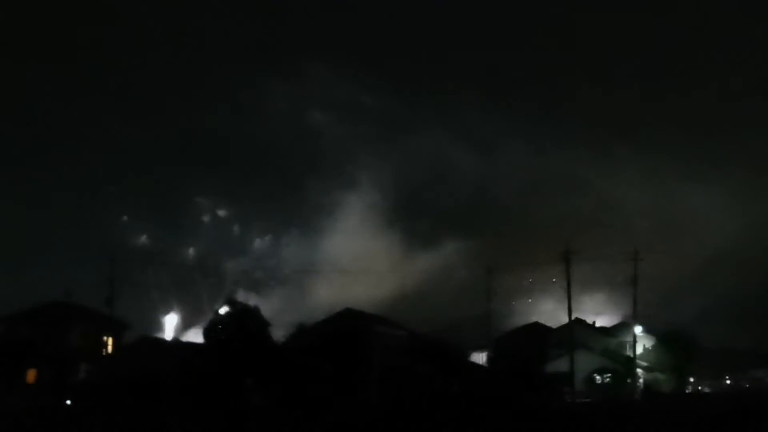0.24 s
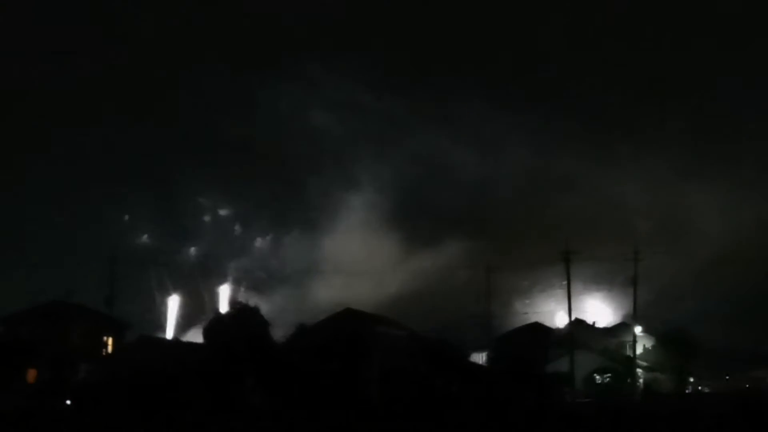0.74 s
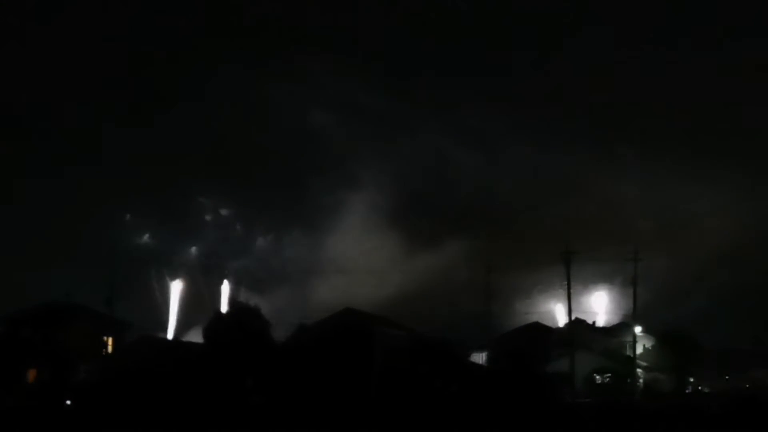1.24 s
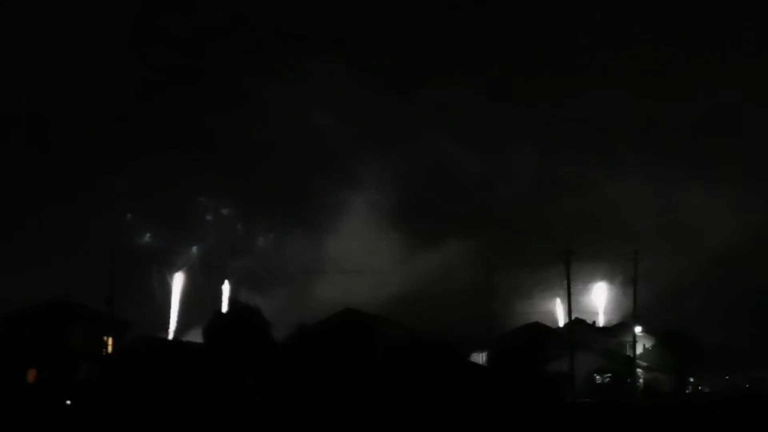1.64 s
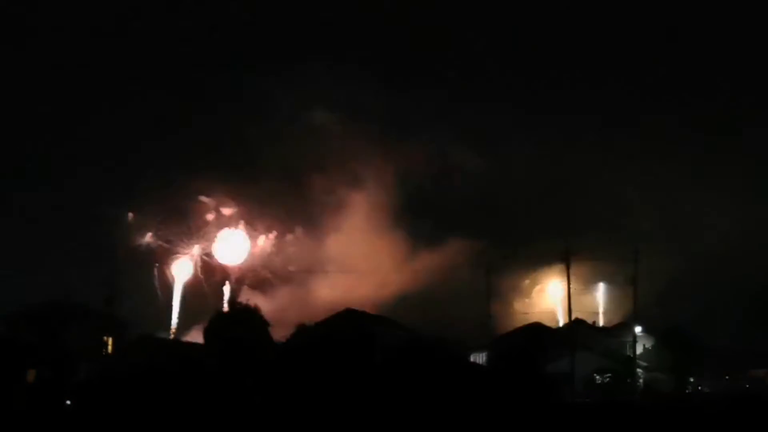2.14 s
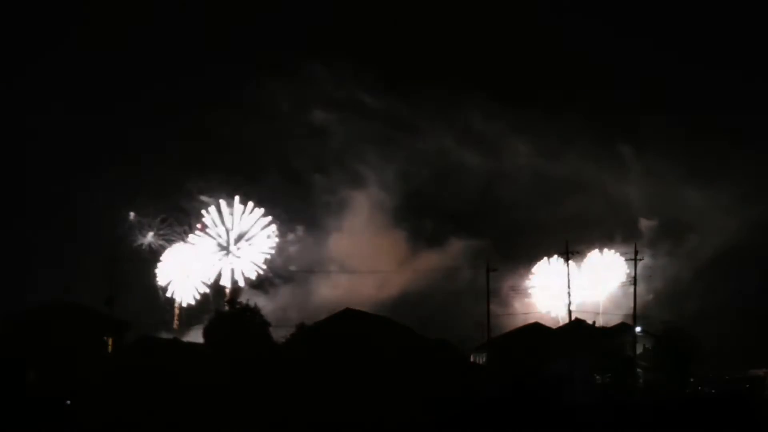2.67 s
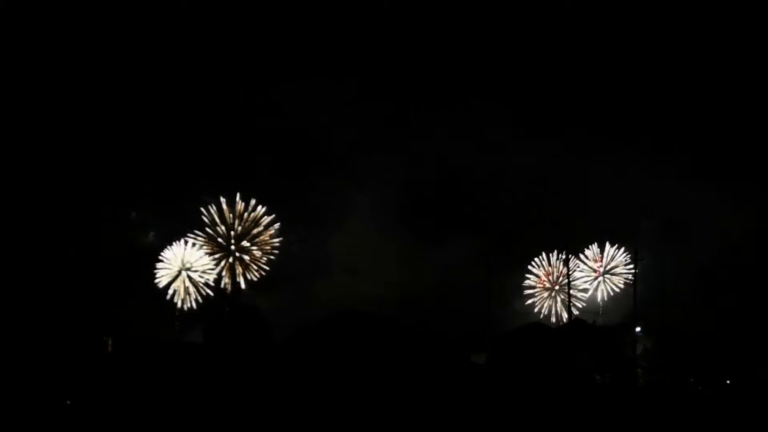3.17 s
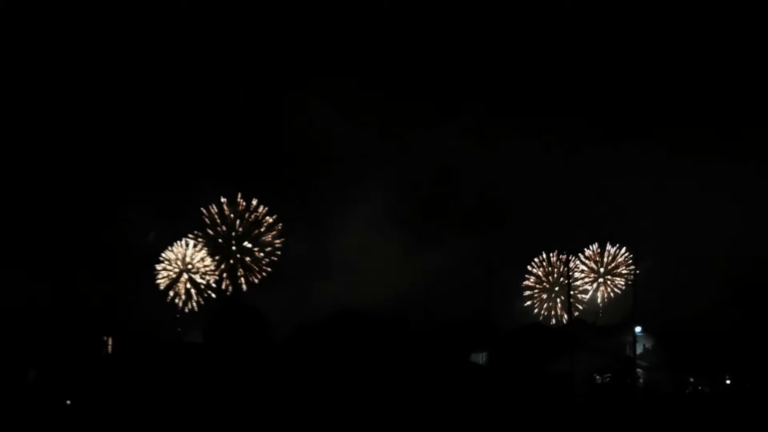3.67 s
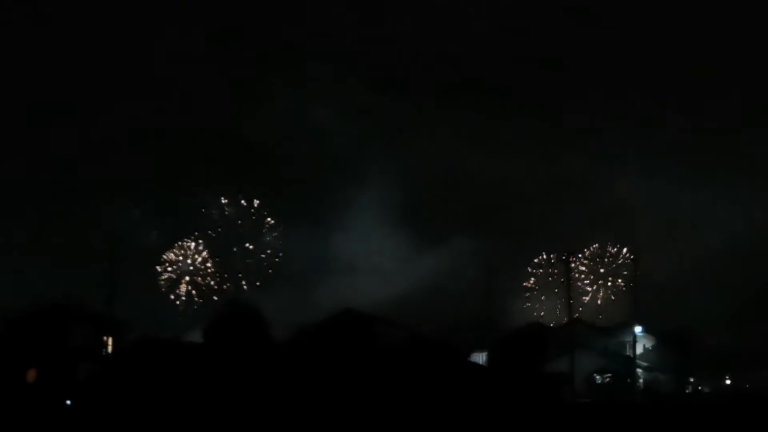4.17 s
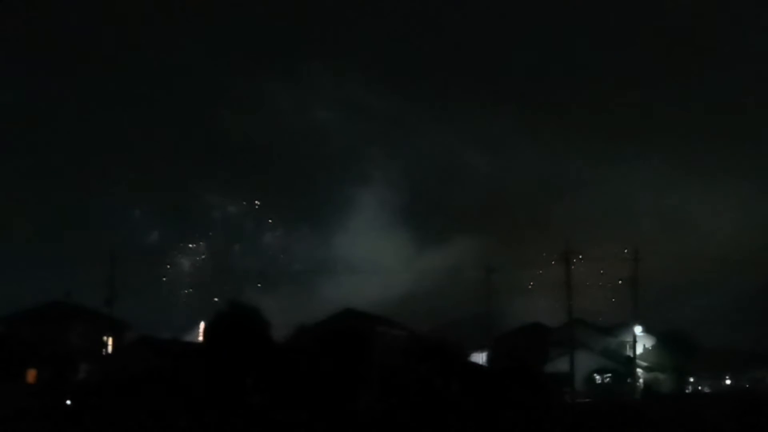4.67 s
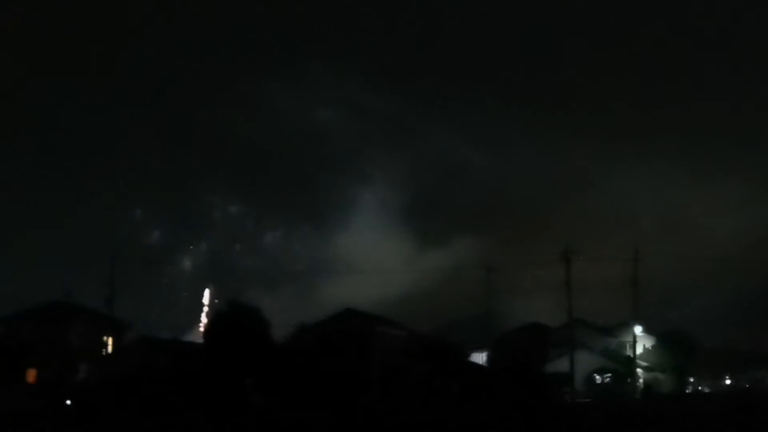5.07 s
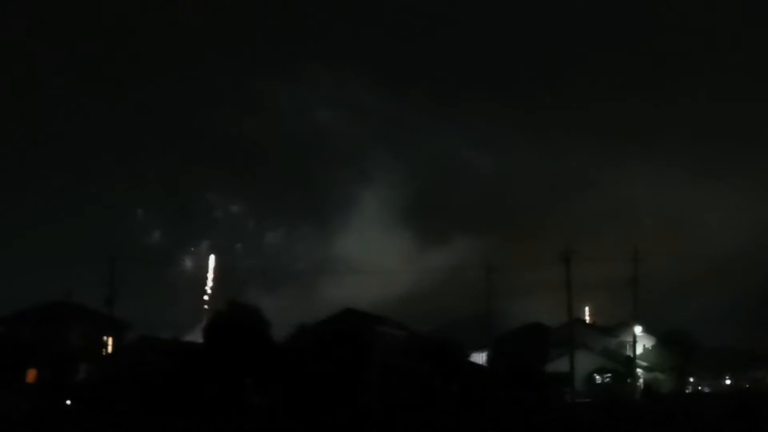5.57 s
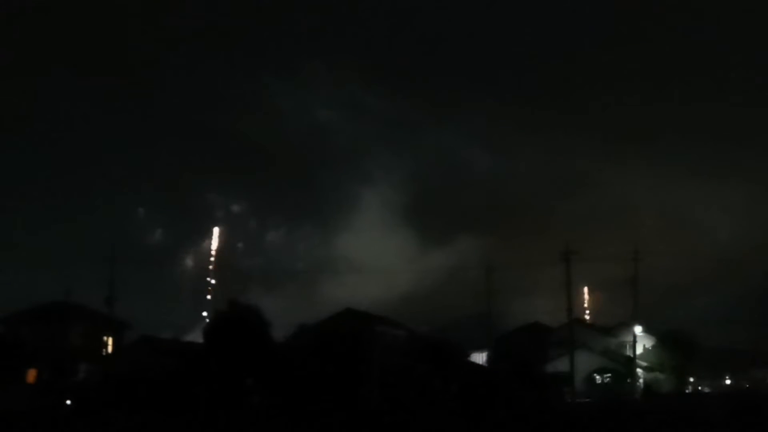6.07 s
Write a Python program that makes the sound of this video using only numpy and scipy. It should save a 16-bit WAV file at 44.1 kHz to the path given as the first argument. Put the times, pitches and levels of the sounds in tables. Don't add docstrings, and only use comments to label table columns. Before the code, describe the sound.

Night, outdoors, fireworks bursting far away across open land. At 0.1 s a sharp crack with a deep thump hits, followed at 0.19 s by a second, fuller blast. Ground, roofs and a wall answer within moments, bright puffs return from house fronts until about 0.5 s, and everything merges into a lumpy, bass-heavy roll that fades. Faint stray echoes knock near 0.9 to 1.3 s. Weaker, rounder low bursts thud at 1.46, 1.58 and 1.81 s, with brighter ground snaps. Between 1.36 and 1.66 s a camera close on the left clatters with dry clicks and a very brief gear whirr; tiny clicks follow at 2.05 s. From 2 to 5 s only dwindling rumble and soft distant thuds remain over town hum and fine steady hiss. At 5.15 and 5.25 s two strong bangs crack, their puffs and deep echoes rolling until the end at 6.3 s.

```python
import sys
import numpy as np
from scipy import signal
from scipy.fft import rfft, irfft, next_fast_len
from scipy.io import wavfile
from scipy.ndimage import uniform_filter1d, map_coordinates

SR = 44100
rng = np.random.default_rng(int(sys.argv[2]) if len(sys.argv) > 2 else 0)


def output_pcm(signal):
    pcm = np.clip(np.atleast_2d(signal).T, -1, 1) * 32767
    wavfile.write(sys.argv[1], SR, np.round(pcm).astype(np.int16))


def gain_from_db(level_db):
    decades = np.asarray(level_db, float) / 20
    return 10 ** decades


N = 278271

# time in seconds, crack level in dB, crack pitch in Hz, thump level in dB, thump pitch in Hz.
BURSTS = [
    (.0898, -5, 250, -16, 95),
    (.1847, -4, 240, -22, 95),
    (.1895, -6, 290, -13, 85),
    (.1936, -26, 340, -18, 115),
    (1.4602, -19, 420, -8, 120),
    (1.5808, -19, 330, -10, 120),
    (1.8117, -11, 300, -12, 140),
    (5.1475, -4.5, 300, -13, 195),
    (5.2471, -7, 260, -7, 85),
]
# time in seconds, level in dB, pitch in Hz.
GROUND_SNAPS = [
    (.0931, -21, 300),
    (.0980, -24, 340),
    (.1879, -13, 340),
    (1.4627, -14, 1200),
    (1.5835, -25, 510),
    (1.8125, -12, 780),
    (1.8169, -20, 640),
    (5.2495, -8, 320),
]
# time in seconds, crack level in dB, crack pitch in Hz.
ROOF_BOUNCES = [
    (.1007, -20, 220),
    (.1994, -25, 270),
    (1.5896, -27, 380),
    (1.8155, -25, 690),
    (1.8185, -20, 190),
    (5.1557, -17, 290),
    (5.1585, -17, 270),
    (5.2550, -25, 330),
]
# time in seconds, crack level in dB, thump level in dB.
WALL_ECHOES = [
    (0.1367, -31.5, -25.5),
    (0.225, -16, -40),
    (0.2318, -28.5, -22),
    (5.195, -22, -26.5),
    (5.2971, -33, -18.5),
]
# time in seconds, knock level in dB, thud level in dB.
LATE_ECHOES = [(0.293, -33, -26.5), (0.318, -32, -38), (0.892, -66, -65), (1.022, -42, -36.5),
               (1.271, -41.5, -57), (1.925, -34, -42), (1.931, -36, -42), (2.29, -37.5, -44),
               (2.352, -42.5, -51.5), (2.467, -47, -55), (2.928, -45, -37), (3.085, -58, -40),
               (3.191, -61, -52), (3.282, -77, -36), (3.434, -52.5, -39), (3.665, -57, -39),
               (3.692, -52, -52), (3.74, -46, -33.5), (3.771, -71.5, -35), (3.906, -65.5, -55),
               (4.014, -71, -36.5), (4.195, -48, -64), (4.348, -65.5, -41), (5.409, -44.5, -50),
               (5.51, -31.5, -45), (5.732, -48, -46), (5.82, -61, -46), (5.882, -38.5, -64),
               (6.03, -44, -55)]
# frequency in Hz, left over right in dB.
BURST_LEAN = [(60, 1.5), (180, 1), (550, -3.5), (1650, -0.5), (4970, -8), (15000, 2.5)]
# frequency in Hz, gain in dB.
EDGE_TONE = [(60, -3), (130, -5.5), (300, -2), (1000, 1.5), (2500, 8), (5000, 7.5), (8000, -4.5)]
# frequency in Hz, time to fall 60 dB in seconds.
LAND_FADE = [(60, 0.35), (300, 0.22), (1500, .1), (3000, 0.033), (6000, 0.012)]
# time in seconds, peak level in dB.
PUFFS = [(0.105, -47.5), (0.204, -39), (0.289, -46.5), (0.369, -44), (0.391, -42), (0.468, -40),
         (0.5294, -56), (2.155, -65), (2.285, -62.5), (2.35, -67), (3.738, -65.5), (5.273, -48),
         (5.337, -48.5), (5.402, -56), (5.46, -54), (5.52, -47.5), (5.5384, -47), (5.572, -49.5),
         (5.629, -53.5), (5.876, -57.5)]
# frequency in Hz, level in dB per Hz.
PUFF_TONE = [(410, -25), (700, 0), (1130, -9.5), (1290, -16.5), (1570, -7.5), (1980, -4), (2240, -6),
             (2660, -16.5), (3760, -24), (5380, -32), (8000, -54), (10400, -82.5), (17600, -120)]
# time in seconds, level in dB, hold in seconds,
# bass share in dB, bass delay in seconds.
VOLLEYS = [
    (.1, -46.5, 0.18, -9, 0.038),
    (0.203, -42.5, 0.3, -0.5, 0.11),
    (1.471, -52, 0.087, -7, 0.057),
    (1.572, -48.5, 0.047, 0, 0.14),
    (1.818, -52.5, .2, 4, 0.0426),
    (5.15, -47, 0.092, -17.5, 0.04),
    (5.261, -42.5, 0.29, 5.5, .06),
]
# frequency in Hz, level in dB per Hz.
BOOM_TONE = [(15, -47), (25, -20), (96, 5), (114, -0.5), (135, -3), (200, -11), (260, -49), (440, -120)]
# frequency in Hz, level in dB per Hz.
BODY_TONE = [(82, -28.5), (140, -5), (291, -6), (398, -9), (753, -13.5), (1100, -19), (1430, -55),
             (2420, -120)]
# frequency in Hz, level in dB per Hz.
RATTLE_TONE = [(470, -50.5), (800, -21.5), (1060, -15.5), (1190, 3), (1290, 3), (2330, -7), (7000, -46.5),
               (9100, -79), (15400, -120)]
# frequency in Hz, left-right likeness from -1 to 1.
LIKENESS = [(60, 0.96), (130, 0.98), (290, 0.86), (640, 0.33), (1410, -0.23), (3100, 0.03), (6820, 0.1),
            (15000, 0.05)]
# time in seconds, peak level in dB, left over right in dB.
CLICKS = [(.405, -52, -4), (.415, -51, -2), (1.3627, -51.5, 8), (1.3805, -59, 0.5), (1.4903, -27.5, -1),
          (1.5084, -43, 12.5), (1.5141, -23.5, 15), (1.5524, -36, 21.5), (1.5865, -25.5, 12),
          (1.6436, -48, 3), (1.6504, -19.5, 11), (1.6644, -52.5, 2), (2.054, -57, 6), (2.061, -47, -4.5),
          (2.0786, -56, 5)]
# frequency in Hz, level in dB per Hz.
CASING_TONE = [(710, -44.5), (1200, -13.5), (2130, -14), (2510, -4.5), (3080, -17.5), (4750, -13),
               (7410, -17.5), (8530, -11), (14000, -29.5), (16000, -29.5)]
# end in seconds, length in seconds, top level in dB.
MOTOR_RUNS = [
    (1.572, .08, -42),
    (1.588, .01, -51.5),
    (1.661, .012, -58),
]
# frequency in Hz, level in dB.
GEAR_TONE = [(880, -18), (1500, -5.5), (2060, -5.5), (2910, -4), (4920, -12.5), (5330, -13), (8660, -12),
             (14600, -16), (16000, -26)]
# time in seconds, hum level in dB.
TOWN_LEVEL = [(0, -51.5), (2.4, -51.5), (3.5, -51), (5.1, -53), (6.31, -52)]
# frequency in Hz, level in dB per Hz.
HUM_TONE = [(15, -28.5), (25, -9.5), (59, 3), (113, -8.5), (245, -3.5), (286, -6.5), (545, -9),
            (609, -11.5), (711, -13.5), (948, -20.5), (5000, -54.5), (6500, -93.5), (11000, -120)]
# frequency in Hz, level in dB per Hz.
HISS_TONE = [(2000, -39.5), (3500, -16), (4300, 1.5), (5200, 2.5), (7000, -2.5), (8200, -4.5), (9700, 0),
             (10900, 4), (12500, -2), (15700, -4), (16000, -20), (16500, -120)]


def shells():
    out = np.zeros((2, N))
    lead_s = 1 / 100
    fronts = BURSTS + [(*row, -60, 100) for row in GROUND_SNAPS]
    fronts += [(*row, -31, 115) for row in ROOF_BOUNCES]
    for s, *shape in fronts:
        lag_ms = 0.04 if 1 < s < 2 else 0.072
        add(out, s - lead_s, front(*shape, lag_ms))
    for s, crack_db, thump_db in WALL_ECHOES:
        add(out, s - lead_s, front(crack_db, 228, thump_db, 102, lag_ms=0.23))
    chances = rng.uniform(-0.65, 1, (len(LATE_ECHOES), 2))
    for (s, knock_db, thud_db), (direction, size) in zip(LATE_ECHOES, chances):
        t = moments(0.15 * direction)
        knock = swing(t, knock_db - 3, 950 * (1 + 0.54 * size), 0.95, 0.00018)
        thud = swing(t, thud_db, 240 * (1 + 0.15 * size), 1.1, 0.0009)
        add(out, s - lead_s + 0.001, knock + thud)
    return filtered(out, lambda hz: 1 / (1 + (hz / 3200) ** 6))


def front(crack_db, crack_hz, thump_db, thump_hz, lag_ms):
    t = moments(lag_ms)
    crack_rise, thump_rise = 0.0001 * gain_from_db(-0.4 * np.array([crack_db, thump_db]))
    tip = swing(t, 1.4 * crack_db - 9.5, 1600, 2.5, 0.8 * crack_rise)
    crack = swing(t, crack_db, crack_hz, 1.4, crack_rise)
    thump = swing(t, thump_db, thump_hz, 1.3, thump_rise)
    return tip + crack + thump


def moments(lag_ms):
    t = np.arange(-SR // 100, SR // 12) / SR
    return t + np.array([[1], [-1]]) * lag_ms / 2000


def swing(t, db, hz, damping, rise):
    onset = 0.5 + 0.5 * np.tanh(t / rise + 1)
    decay = np.exp(-damping * hz * np.abs(t))
    return gain_from_db(db) * onset * decay * np.cos(2 * np.pi * hz * t)


def ragged(x):
    t = np.arange(SR // 8) / SR
    fading = gain_from_db(-60 * t / 0.062)
    trail = signal.fftconvolve(np.maximum(x, 0) ** 2, fading / 40)[:N]
    noise = gain_from_db(-25.5) * trail * rush(PUFF_TONE, lumpy_db=3.5, lump_ms=4)
    return filtered(noise, lambda hz: 1 / (1 + (hz / 4500) ** 4))


def scatter(x):
    out, step = np.zeros((2, N)), SR // 7
    for start in range(0, N, step):
        hz, t, z = signal.stft(rng.standard_normal((2, SR // 3)), SR, nperseg=256)
        fading = gain_from_db(-60 * t / along(LAND_FADE, hz)[:, None])
        mid, side = signal.istft(z * fading, SR, nperseg=256)[1]
        tail = np.array([mid, side]) / np.linalg.norm(mid)
        add(out, start / SR + 0.001227, signal.fftconvolve(x[None, start:start + step], tail, axes=1))

    def width(hz):
        likeness = along(LIKENESS, hz)
        return np.sqrt([1 + likeness, 1 - likeness]) / np.sqrt(2)

    mid, side = filtered(out, width)
    return np.array([mid + side, mid - side])


def puffs():
    fall_s = 0.027
    rise_s = fall_s / 4
    t = np.arange(N) / SR - rise_s
    level = np.zeros(N)
    for s, db in PUFFS:
        spread = np.where(t < s, rise_s, fall_s)
        level += gain_from_db(db - 4) * np.exp(-((t - s) / spread) ** 2)
    return level * rush(PUFF_TONE, lumpy_db=2, lump_ms=5)


def roll():
    s, db, hold, bass_db, late = np.transpose(VOLLEYS)[:, :, None]
    rattle_db = -13.5
    boom = swell(s + late, db + bass_db, hold + 0.09 - late, fall=72, far_db=-13)
    body = swell(s, db, hold, fall=95, far_db=-7.5)
    rattle = swell(s, db + rattle_db, hold, fall=49, far_db=-21.5 - rattle_db)
    out = boom * rush(BOOM_TONE, lumpy_db=1, lump_ms=30)
    out += body * rush(BODY_TONE, lumpy_db=2, lump_ms=18)
    return out + rattle * rush(RATTLE_TONE, lumpy_db=2.5, lump_ms=12)


def swell(start, db, hold, fall, far_db):
    t = np.arange(N) / SR - start
    near = gain_from_db(db - fall * np.maximum(t - hold, 0)) ** 2
    far = gain_from_db(db + far_db - 7.37 * np.maximum(t, 0)) ** 2
    rise = np.clip(t / 0.015, 0, 1) ** 2
    return np.sqrt(np.sum(rise * (near + far), axis=0))


def camera():
    return casing_clicks() + gear_whirr()


def casing_clicks():
    clicks, t = np.zeros((2, N)), np.arange(SR // 10) / SR
    for s, db, pan_db in CLICKS:
        envelope = gain_from_db(db - 60 * t / 0.015) * (1 - np.exp(-t / 0.00012))
        rattle = envelope * rng.standard_normal((2, len(t)))
        add(clicks, s, rattle * gain_from_db(np.array([[0.5], [-0.5]]) * pan_db))
    return gain_from_db(9.5) * filtered(clicks, lambda hz: gain_from_db(along(CASING_TONE, hz)))


def gear_whirr():
    gears = unit(filtered(rng.standard_normal((2, N)), lambda hz: gain_from_db(along(GEAR_TONE, hz))))
    t = np.arange(N) / SR
    level = np.zeros(N)
    for end, length, db in MOTOR_RUNS:
        slope = np.where(t < end, 300, 800)
        level += (t > end - length) * gain_from_db(db - slope * np.abs(t - end))
    return level * gain_from_db([[3], [-9]]) * gears


def night():
    s, db = np.transpose(TOWN_LEVEL)
    level = uniform_filter1d(np.interp(np.arange(N) / SR, s, db), size=200)
    hum = gain_from_db(level) * rush(HUM_TONE, lumpy_db=1.34, lump_ms=25)
    return hum + gain_from_db(-87) * rush(HISS_TONE, lumpy_db=0, lump_ms=10)


def rush(spectrum, lumpy_db, lump_ms):
    per_second = 1000 / lump_ms
    knots = rng.standard_normal(int(N / SR * per_second) + 4)
    lumps = map_coordinates(knots, [np.arange(N) / SR * per_second])
    pair = rng.standard_normal((2, N)) * gain_from_db(lumpy_db * lumps)

    def colour(hz):
        turn = np.arccos(np.clip(along(LIKENESS, hz), -1, 1)) / 2
        return gain_from_db(along(spectrum, hz)) * [np.cos(turn), np.sin(turn)]

    mid, side = filtered(pair, colour)
    return unit(np.array([mid + side, mid - side]))


def unit(x):
    return x / np.sqrt(np.mean(x ** 2) + 1e-20)


def along(points, hz):
    f, v = np.transpose(points)
    return np.interp(np.log(hz + 1), np.log(f + 1), v)


def filtered(x, response):
    m = next_fast_len(N + SR // 2)
    return irfft(rfft(x, m) * response(np.fft.rfftfreq(m, 1 / SR)), m)[..., :N]


def add(out, s, sound):
    part = out[:, round(s * SR):][:, :sound.shape[1]]
    part += sound[:, :part.shape[1]]


def scene():
    bangs = shells()
    mid = bangs.mean(0)
    side = 1.7 * (bangs[0] - bangs[1]) / 2
    lean = lambda hz: gain_from_db(along(BURST_LEAN, hz) * np.array([[0.5], [-0.5]]))
    direct = filtered(np.array([mid + side, mid - side]), lean)
    near = gain_from_db(-17) * scatter(filtered(mid, lambda hz: gain_from_db(along(EDGE_TONE, hz))))
    return direct + ragged(mid) + near + puffs() + roll() + camera() + night()


def band_limit(x):
    return signal.sosfilt(signal.butter(12, 16500, fs=SR, output="sos"), x)


def record(dry):
    bass = lambda hz: (1j * hz / (32 + 1j * hz)) ** 2
    top = lambda hz: 0.5 - 0.5 * np.tanh((hz - 16000) / 150)
    mix = filtered(dry, lambda hz: bass(hz) * top(hz))
    return band_limit(mix)


dry = scene()
out = record(dry)
output_pcm(out)
```